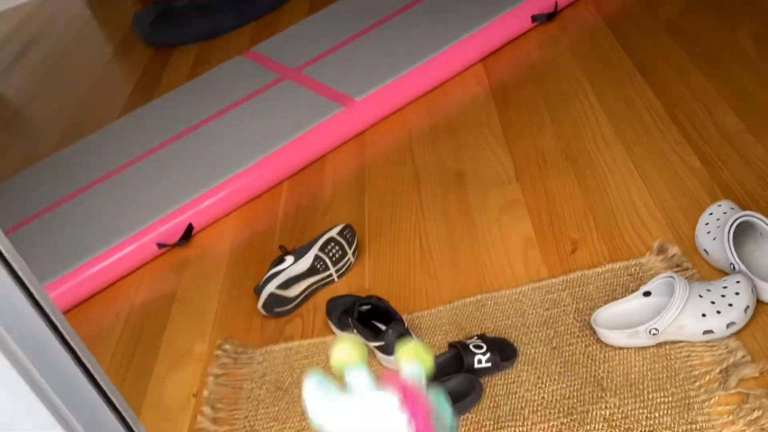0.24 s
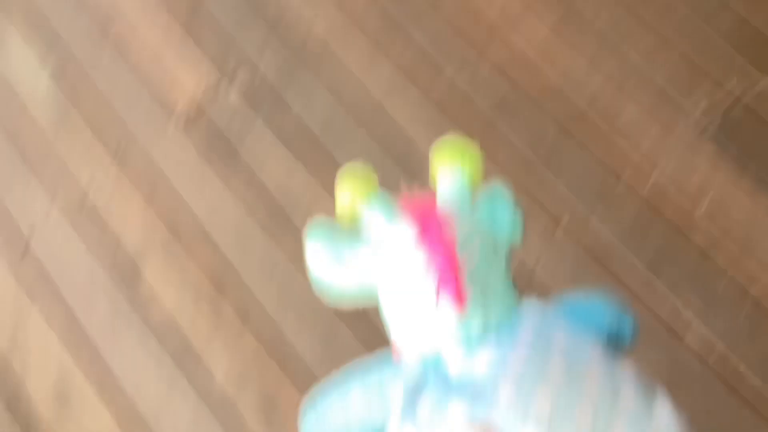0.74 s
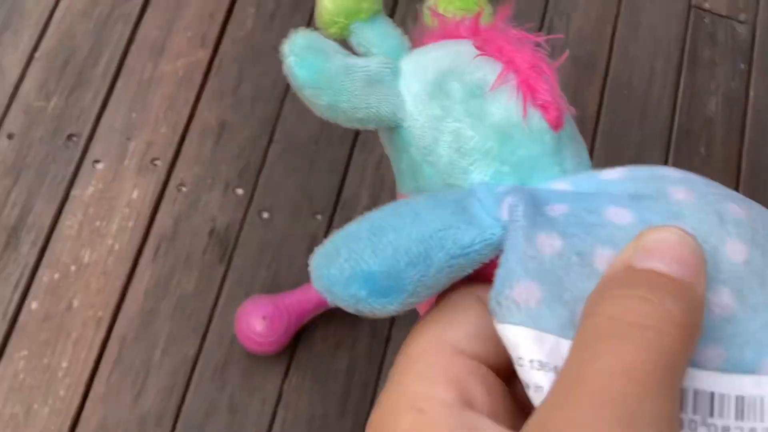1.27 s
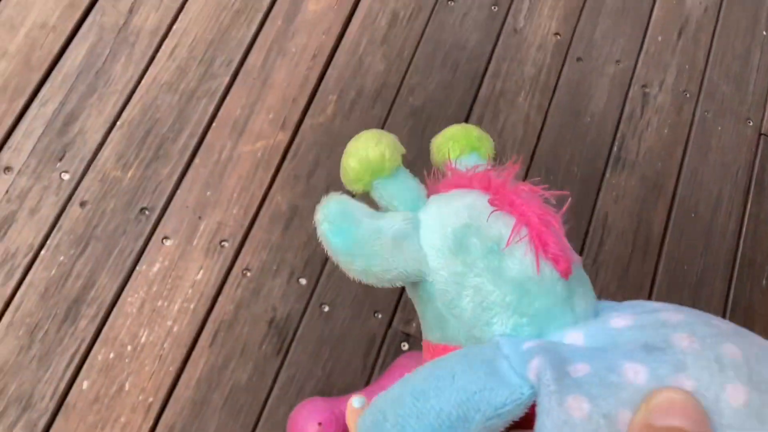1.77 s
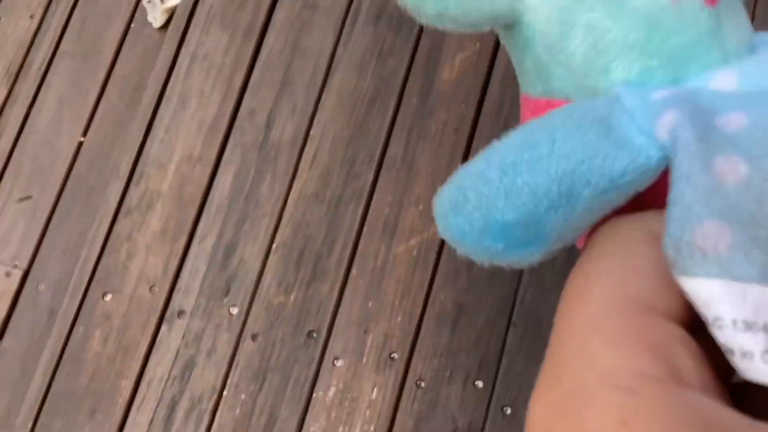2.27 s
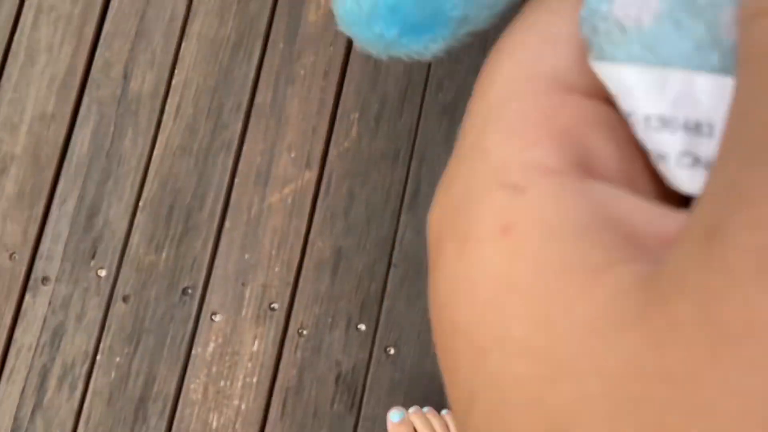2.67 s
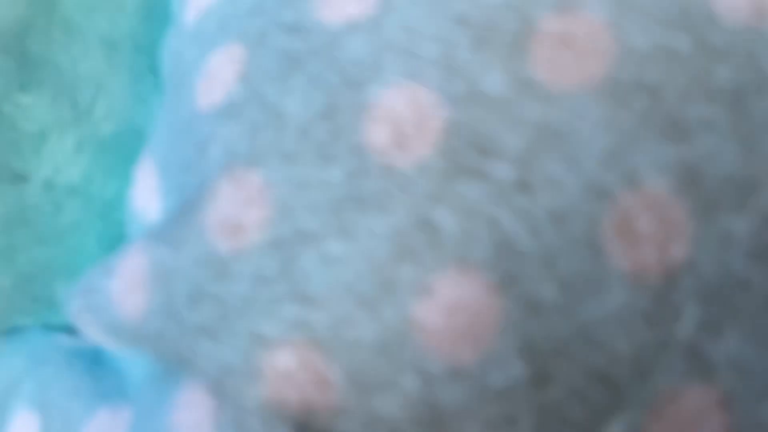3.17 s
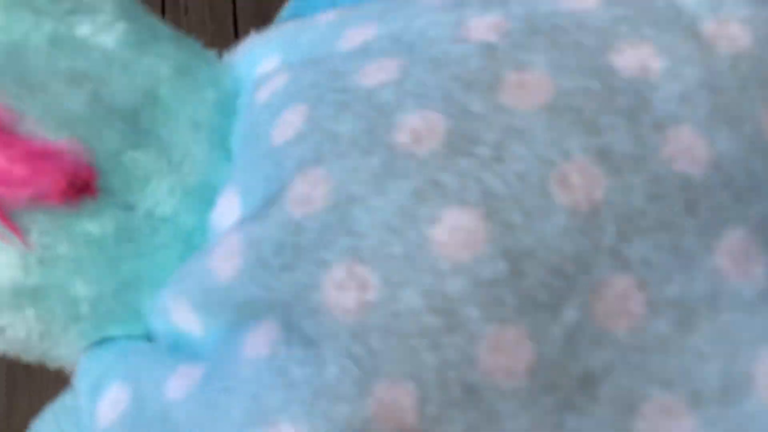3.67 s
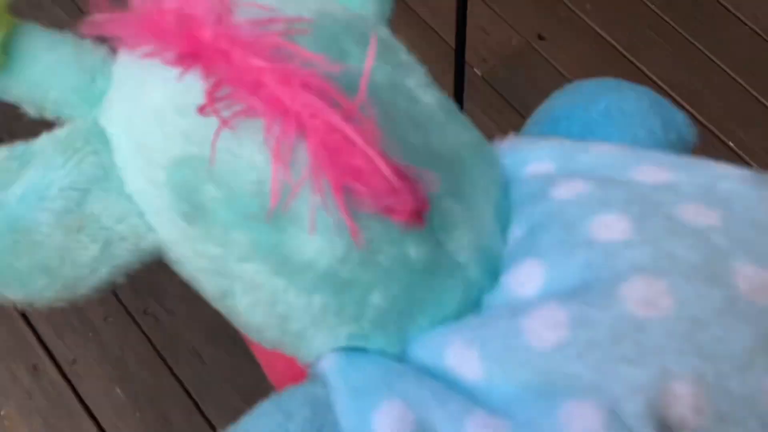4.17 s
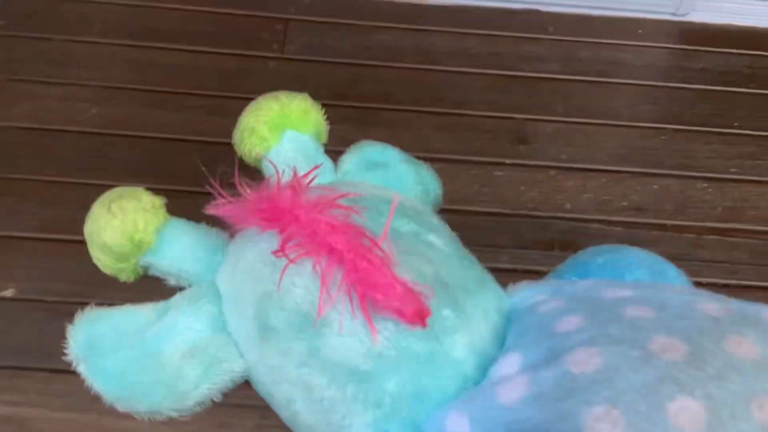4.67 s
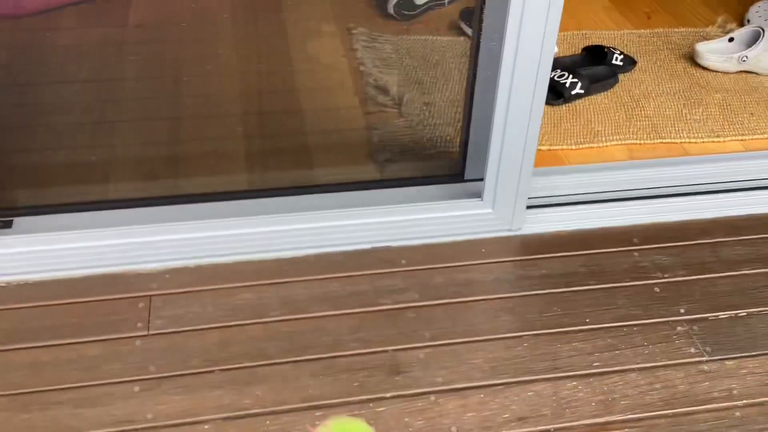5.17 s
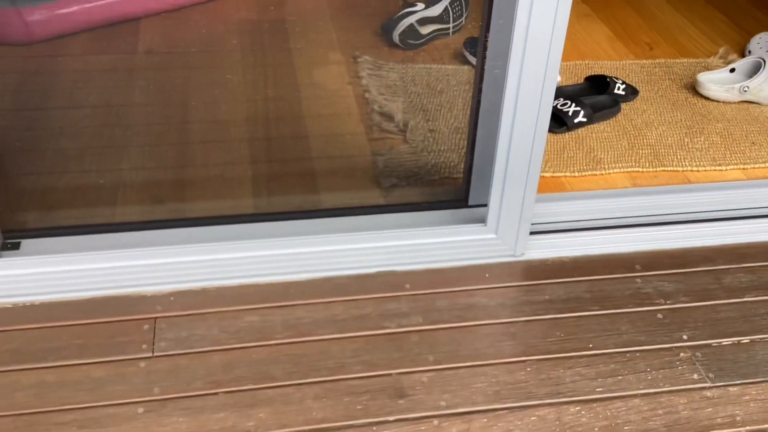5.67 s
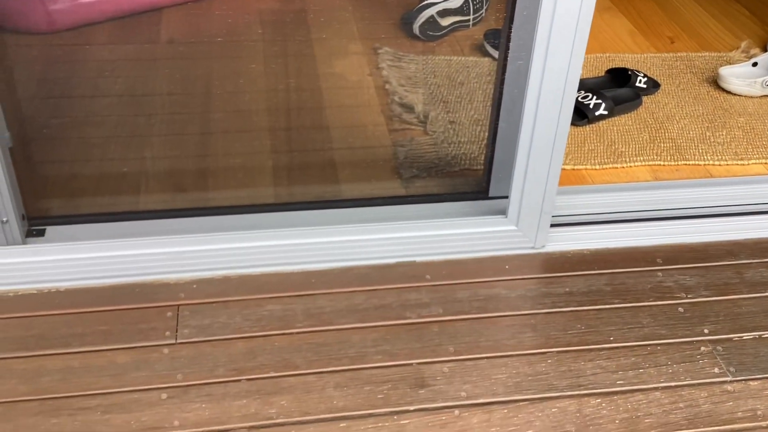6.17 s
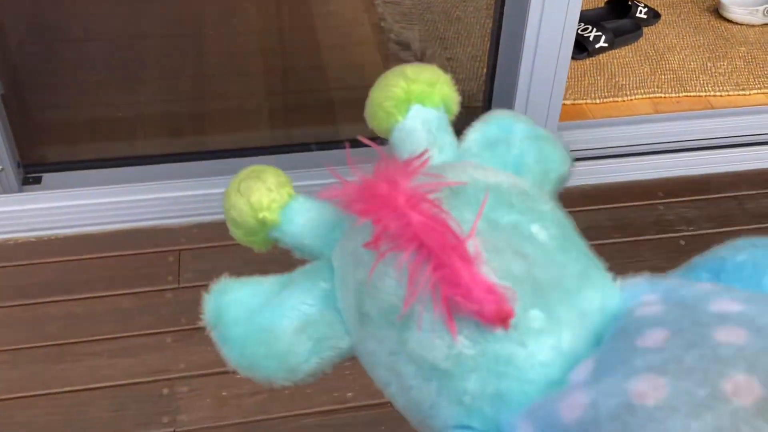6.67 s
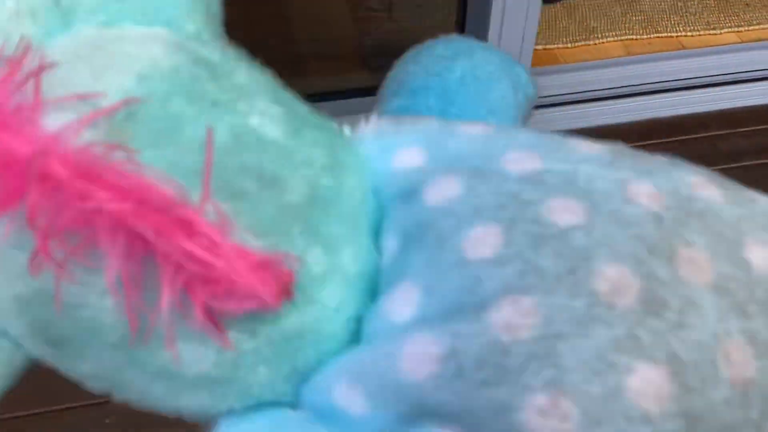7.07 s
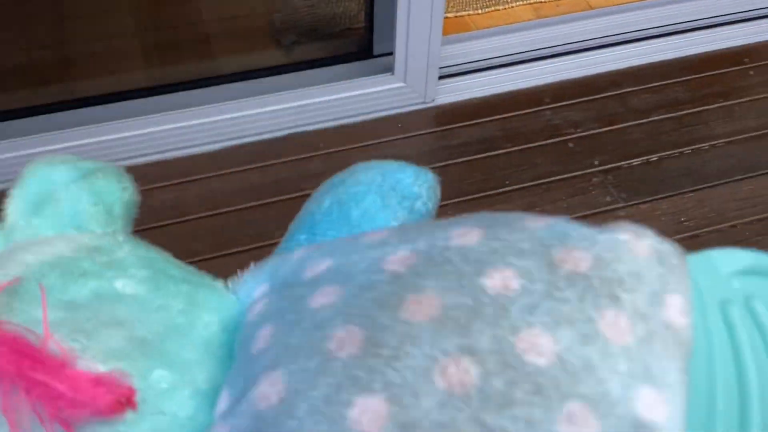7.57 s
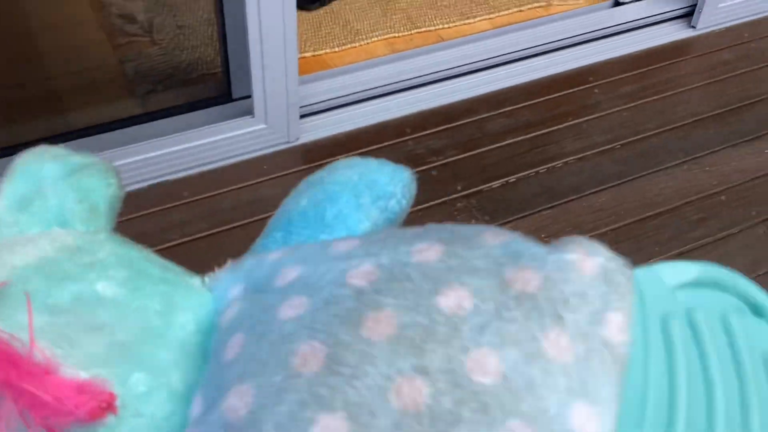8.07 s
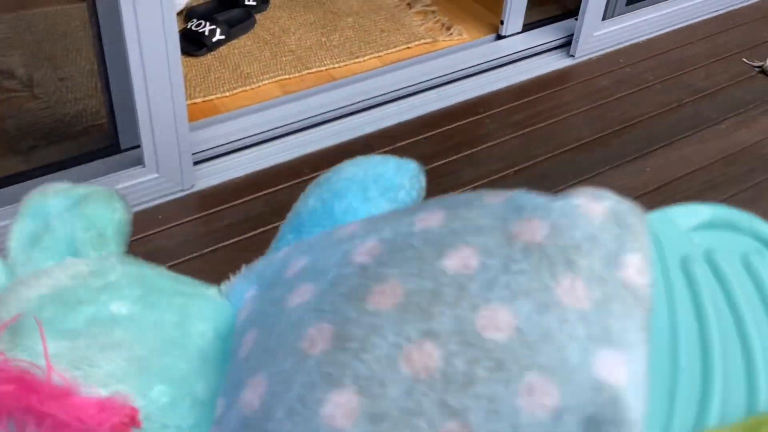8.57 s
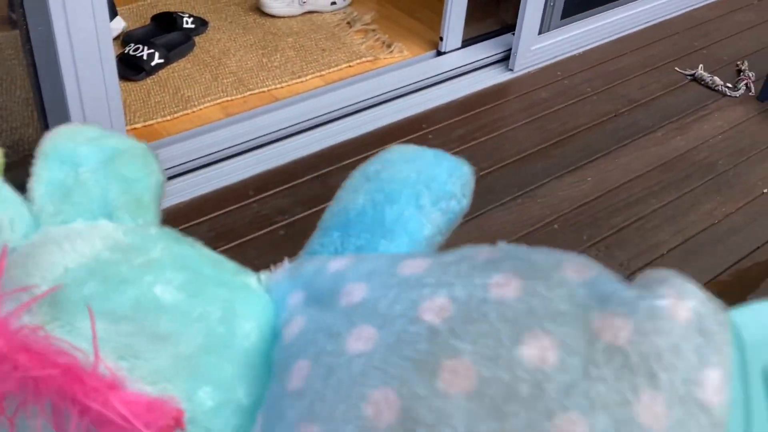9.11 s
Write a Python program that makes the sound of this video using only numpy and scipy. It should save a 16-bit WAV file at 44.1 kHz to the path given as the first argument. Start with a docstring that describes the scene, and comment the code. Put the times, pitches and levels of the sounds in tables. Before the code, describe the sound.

A plush dog toy is squeezed by hand close to the microphone, in a doorway and on a wooden deck. Each squeeze gives a very short, high, reedy squeak, and each release a slightly higher one. Faint rustles, ticks and soft knocks open the scene. Four squeaks sound from about 0.9 to 1.7 seconds, and another pair near 2.5, followed by a dull bump with a click and a soft foot scuff. From 3.2 to 4.8 seconds comes a fast, closer run of alternating squeaks, with two cracking into a screech near 3.5 and 3.8. Five more follow from 5.2 to 6.2. A pause holds only faint ticks and fabric rubbing. After a tiny squeak and soft knocks at 7.6, an even run lasts from 7.9 to 9.3 seconds. The wall and boards reflect the squeaks slightly, over a very quiet distant rumble and outdoor wash.

```python
"""In a doorway and on a wooden deck, a hand pumps the squeaker in a plush dog toy, close by.
Each squeeze blows a low reed and each release draws air back through a higher one. The hand shifts
the plush round the squeaker, so every squeak has its own colour. Soft knocks, ticks and rustles come
from the toy, hand and feet; house wall and deck answer faintly over a bed of distant rumble and wash."""
import sys
import numpy as np
from scipy import signal
from scipy.fft import rfft, irfft, next_fast_len
from scipy.io import wavfile

SR = 44100
rng = np.random.default_rng(int(sys.argv[2]) if len(sys.argv) > 2 else 0)


def store_wav(level_fs):
    """Save 16-bit WAV to argv[1]."""
    pcm = np.round(np.clip(np.atleast_2d(level_fs), -1, 1) * 32767)
    wavfile.write(sys.argv[1], SR, pcm.T.astype(np.int16))


N = 411894

# one squeak a row: (time [s], length [s], pressure crest [share of length], pitch at crest [Hz],
# reed level [dB], swell to crest [dB], fade after it [dB], roughness [0-1], delay of the bounce off
# the hand [ms], bounce strength [0-1], plush colour at 2.5, 5, 10 and 14 kHz [dB])
SQUEEZES = [(.947, .1, 0.1, 856.3, -30.5, 6.4, 8.7, .14, 0.27, .2, -4, -1.5, -1, 4),
            (1.404, 0.063, 0.088, 849, -27.5, 9.1, 10.8, .09, 0.8, .2, -9.5, 0, -11.5, -4),
            (2.474, 0.083, 0.57, 838.5, -32.5, 2.4, 9.9, 0.081, .15, .5, 0.5, 0, -5.5, -6),
            (3.185, .044, 0.086, 839.6, -24.5, 4, 10, 0.35, 0.49, .35, -12.5, -6.5, -1.5, -6),
            (3.459, 0.096, 0.43, 913.4, -28, 5.7, 16.6, .22, .14, .5, 4.5, 5.5, 5.5, 3.5),
            (3.774, 0.083, .49, 915, -29, 6.3, 14.3, 0.49, .15, .65, 6.5, 5.5, 4.5, 7.5),
            (4.088, 0.077, 0.38, 906.3, -23.5, 8.3, 9.5, 0.27, 0.46, .35, -12.5, 1.5, -4, 4.5),
            (4.429, 0.068, 0.63, 876.3, -30, 2.5, 23, 0.13, .15, .5, -3, 1.5, 4, 6.5),
            (4.73, 0.056, 0.63, 900, -24.5, 3.9, 59, 0.36, .52, .2, -11.5, -3, -2.5, -2.5),
            (5.428, 0.076, 0.3, 866.4, -26, 5.3, 7.8, 0.12, 0.69, .2, -12, 3.5, -5.5, -5.5),
            (5.8, 0.075, 0.28, 871, -25.5, 2.2, 6.9, 0.18, 0.49, .2, -12, 3.5, -4, -3.5),
            (6.154, .078, 0.32, 873.6, -25.5, 3.2, 13.4, 0.13, .48, .2, -12, 3.5, -11, -4.5),
            (7.893, 0.083, 0.43, 860.7, -27.5, 3.6, 15.3, 0.17, 0.27, .2, -1.5, -0.5, -1.5, -1.5),
            (8.298, 0.071, 0.13, 841.3, -27.5, 1, 7.2, 0.2, .5, .35, -8.5, -0.5, -2, -0.5),
            (8.7, 0.078, 0.3, 858.6, -26, 5.2, 13.8, .11, .5, .35, -11.5, -1, -3, 0.5),
            (9.084, 0.074, 0.36, 849, -27, 1.2, 14.4, 0.077, .51, .35, -14, -3, -4, -1.5)]
# spectrum of rubbing plush: (frequency [Hz], level [dB])
RUB_TONE = [(100, -20), (700, -5.5), (1500, 0), (3000, -2.5), (4300, -3), (5900, -1.5), (6500, -11),
            (10000, -8.5), (15500, -12.5)]


def squeezes():
    """Each squeeze blows air out through the low reed."""
    # resonances of the low reed and its pipe: (frequency [Hz], gain [dB])
    pipe_tone = [(700.0, 3), (900.0, 1.5), (1700.0, 2.5), (2600.0, 10), (3500.0, 3.5), (4300.0, -0.6),
                 (5800.0, -2.1), (6900.0, -7.5), (8200.0, -4.5), (9500.0, 3.5), (11000.0, 1.5),
                 (12200.0, -4.5), (14000.0, -6.5), (15800.0, -13.5)]
    return squeaks(SQUEEZES, pipe_tone, hz_per_db=9.5, dull_hz=11900, free_hz=1083, start_db=-8.5)


def releases():
    """Each release draws air back in through the high reed."""
    # one inward squeak a row, columns as in SQUEEZES
    breaths = [(1.137, 0.088, 0.34, 1119, -27.5, 2, 5.6, .08, .28, 0.39, .5, 5, -6.5, 0),
               (1.585, 0.078, 0.56, 1109, -28, 2.5, 10, 0.084, .27, 0.59, -4, 3, -5.5, -7),
               (2.669, 0.081, 0.39, 1095, -28.5, 2, 23.5, 0.071, .39, .53, -3.5, 1.5, -5.5, -3.5),
               (3.345, 0.073, 0.49, 1110, -21.5, 1.5, 13, 0.058, .24, 0.24, -4, -5.5, 2, -5),
               (3.635, 0.085, .29, 1110, -22, 1.5, 7.2, 0.053, .39, 0.19, -9, -2, -4, 0),
               (3.95, 0.088, 0.22, 1117, -26.5, 2, 5.3, .08, .16, 0.54, 0.5, 3.5, 2.5, 1.5),
               (4.27, 0.075, .33, 1119, -28.5, 2, 12.6, 0.077, .15, .65, 2, 8, 3, 4),
               (4.603, 0.062, .36, 1110, -24, 0.5, 11.2, 0.082, .42, .15, -5.5, -1.5, -2.5, 2),
               (5.251, .077, 0.055, 1081, -28.5, 0, 6.6, 0.076, 0.27, 0.18, -2.5, 0, 2.5, -6.5),
               (5.62, 0.057, 0.16, 1078, -29.5, 10, 13.3, 0.075, .21, 0.33, 2, 3, -7.5, -1),
               (7.58, .022, 0.15, 1116, -23.5, 4.5, 3.5, 0.12, .67, 0.3, -1.5, 3, 0, -10),
               (8.084, .05, 0.5, 1129, -22.5, 3.5, 4.9, 0.16, 0.65, 0.25, 1, 0.5, -4, -0.5),
               (8.498, 0.043, 0.2, 1090, -25.5, 3, 1.5, 0.093, 0.6, 0.048, -3.5, 2, -2.5, -2.5),
               (8.898, 0.054, 0.41, 1090, -26.5, 3.5, 10.6, .08, 0.55, 0.068, -4.5, 1.5, -2.5, -1.5),
               (9.276, 0.041, 0.27, 1085, -28, 0, 16.8, .08, .23, 0.33, 0, -1, -.5, -5)]
    # resonances of the high reed and its pipe: (frequency [Hz], gain [dB])
    pipe_tone = [(850.0, 0), (1100.0, 1.5), (2200.0, 7), (3300.0, 1.5), (4400.0, -2.5), (5550.0, -10.5),
                 (6600.0, -17.5), (7700.0, -22.5), (8900.0, -3.5), (10000.0, 3), (11100.0, 9),
                 (12300.0, -1.5), (14400.0, -7), (15800.0, -19.5)]
    return squeaks(breaths, pipe_tone, hz_per_db=13.5, dull_hz=11000, free_hz=1340, start_db=-8)


def squeaks(rows, pipe_tone, hz_per_db, dull_hz, free_hz, start_db):
    """Each squeak is coloured by pipe and plush, and comb-filtered by its own bounce off the hand."""
    # bands of the plush colour, the first held at 0 dB: (frequency [Hz])
    plush_bands = [1000, 2500, 5000, 10000, 14000]
    out, hz = np.zeros(N), np.fft.rfftfreq(1024, 1 / SR)
    bass_loss_db = -10 * np.log10(1 + (560 / (hz + 30)) ** 8)  # a small pipe radiates almost no bass
    pipe_db = curve_at(pipe_tone, hz) + bass_loss_db
    for row in rows:
        start, level_db, bounce_ms, bounce = row[0], row[4], row[8], row[9]
        plush_db = curve_at(list(zip(plush_bands, [0, *row[10:]])), hz)
        comb_db = 20 * np.log10(abs(1 + bounce * np.exp(-2j * np.pi * hz * bounce_ms / 1000)))
        add(out, start, colour(reed(row[:8], hz_per_db, dull_hz), pipe_db + plush_db + comb_db))
        add(out, start - .018, gain_of(level_db + start_db) * reed_onset(free_hz))
    return out


def reed(row, hz_per_db, dull_hz, waver=.0022, jitter=.0085, smear=.085, attack_s=.005, release_s=.005):
    """The reed chops the air into pulses; pitch, level and brightness follow the arch of pressure."""
    start, length, crest, crest_hz, level_db, swell_db, fade_db, roughness = row
    t = np.arange(0, length, 1 / SR)
    climb_db = swell_db * np.maximum(1 - t / length / crest, 0) ** 2
    droop_db = fade_db * np.maximum((t / length - crest) / (1 - crest), 0) ** 2.3
    stall_hz = 60 * np.exp((t - length) / .003)  # the pitch sags as the air runs out
    jump, screech = overblowing(start + t)
    hz = crest_hz - hz_per_db * (climb_db + droop_db) - stall_hz + 108 * jump
    # uneven closing of the reed frays the upper harmonics first
    rasp = roughness * (1.2 - .2 * t / length) + screech
    cycles = np.cumsum(hz * (1 + waver * wander(220, len(t)))) / SR
    cycles += jitter * rasp * wander(500, len(t))
    harmonic = np.arange(1, SR / 2 // hz.max())[:, None]
    # the plush shifts under the fingers, so single overtones swell and sink
    sway_db = 1.4 * np.array([wander(78, len(t)) for _ in harmonic]) * np.minimum((harmonic - 1) / 4, 1)
    # overblown, the reed locks on to its second mode, which lifts the overtone near 6 kHz
    shriek_db = 6 * jump * np.exp(-((harmonic * hz - 6000) / 500) ** 2)
    dulling_db = droop_db * (1 + harmonic * hz / dull_hz)
    # near the end the reed no longer shuts fully, so the overtones break off first
    break_db = 6 * np.log(harmonic) * np.exp((t - length) / .0041)
    strength = gain_of(sway_db + shriek_db - dulling_db - break_db)
    chirp = smear * harmonic ** 2 / 2  # the pipe spreads each pulse in time
    pulses = (strength * np.cos(2 * np.pi * (harmonic * cycles - chirp))).sum(0)
    # air hisses through each opening, and spits as the reed first slaps shut
    flow = gain_of(-21 - droop_db) * np.sqrt(rasp) + gain_of(-9) * np.exp(-t / attack_s)
    opening = 1 + np.cos(2 * np.pi * cycles)
    air = flow * opening * noise([(500, -18.5), (4000, 1), (7000, 1), (16000, -7)], len(t))
    fade_in = np.sin(np.pi / 2 * ramp(t, 0, attack_s)) ** 2
    fade_out = np.minimum((length - t) / release_s, 1) ** .62
    return gain_of(level_db - climb_db) * fade_in * fade_out * (pulses + 2 * air)


def reed_onset(hz, growth_s=.0027, overtone_gain=.76):
    """Before it beats, the reed swings freely above its playing pitch; overtones grow with the swing."""
    t = np.arange(-.02, .004, 1 / SR)
    swing = np.exp(np.minimum(t, -3 * t) / growth_s)
    phase = 2 * np.pi * hz * t
    overtones = np.sin(2 * phase) + np.sin(3 * phase) / 2
    return swing * np.sin(phase) + overtone_gain * swing ** 1.5 * overtones


def overblowing(t, jump_s=.0065, slip_s=.012, screech_s=.027):
    """Pitch jump (0-1) and added roughness: the overblown reed leaps up, then screeches as it slips back."""
    # the two hardest squeezes: (time of the jump [s], hold [s])
    overblows = [(3.488, .029), (3.808, .015)]
    jump = screech = 0
    for start, hold in overblows:
        slip = ramp(t, start + hold, slip_s)
        jump += ramp(t, start, jump_s) - slip
        screech += slip - ramp(t, start + hold + slip_s, screech_s)
    return jump, .22 * screech


def last_air(level_db=-52.5, t60=.2):
    """As the reed stops, the last air of each squeeze hisses out of the pipe."""
    # spectrum of the hiss: (frequency [Hz], level [dB])
    hiss_tone = [(500, -23.5), (2000, -3.5), (4500, -2.5), (7500, 2), (11000, 1), (16000, -8)]
    out, t = np.zeros(N), np.arange(SR // 4) / SR
    envelope = gain_of(level_db - 60 * t / t60) * ramp(t, 0, .01)
    for start, length, *_ in SQUEEZES:
        add(out, start + length - .01, envelope * noise(hiss_tone, len(t)))
    return out


def reed_hums():
    """Air too weak to make the reed beat sets it humming in a soft, wavering, falling tone."""
    # weak breaths: (time [s], level [dB], pitch [Hz], length [s])
    breaths = [(4.919, -61, 1284, 0.036), (6.64, -61.5, 1143, 0.037)]
    out = np.zeros(N)
    for start, db, hz, length in breaths:
        size = int(length * SR)
        glide = np.linspace(1.04, .96, size) + .036 * wander(200, size)
        cycles = np.cumsum(hz * glide) / SR
        add(out, start, gain_of(db) * np.hanning(size) * np.sin(2 * np.pi * cycles))
    return out


def knocks(rise_s=.0049, puff_db=-2):
    """Bulb, hand and feet give damped knocks, each a low tone in a broad puff of noise."""
    # soft impacts: (time [s], level [dB], pitch [Hz], t60 [s])
    hits = [(0.775, -44.5, 326, 0.058), (0.846, -47, 276, 0.15), (2.015, -52, 215, 0.12),
            (2.698, -51, 400, 0.17), (2.764, -51.5, 424, .06), (2.772, -39, 193, 0.043),
            (2.78, -35.5, 106.3, 0.067), (3.414, -46, 345, 0.065), (3.627, -29, 340, 0.025),
            (4.15, -53, 400, 0.063), (4.237, -43, 330, 0.039), (4.482, -50, 344, 0.064),
            (4.561, -41.5, 306, 0.045), (4.842, -47, 301, 0.05), (7.04, -53.5, 263, 0.16),
            (7.6, -42, 448, 0.069), (7.614, -35.5, 330, 0.034), (7.745, -45, 263, .07),
            (8.128, -53, 470, 0.059), (8.156, -34.5, 350, 0.022), (8.537, -57, 410, 0.062)]
    out, t = np.zeros(N), np.arange(SR // 3) / SR
    for start, db, hz, t60 in hits:
        puff_tone = [(hz / 4, -18), (hz / 2, -3), (hz, 0), (hz * 2, -10), (hz * 5, -30), (hz * 25, -60)]
        body = np.sin(2 * np.pi * hz * t) / 2 + gain_of(puff_db) * noise(puff_tone, len(t))
        add(out, start, gain_of(db - 60 * t / t60) * (1 - np.exp(-t / rise_s)) * body)
    return out


def ticks():
    """Plastic and seams tick in sharp, fast-dying bursts of noise."""
    # sharp impacts: (time [s], level [dB], t60 [s])
    hits = [(0.542, -52.5, 0.046), (0.639, -53.5, .03), (0.675, -54, 0.033), (0.743, -52, 0.033),
            (0.774, -58, .04), (0.845, -63, 0.03), (0.866, -51.5, 0.045), (2.765, -35.5, 0.0066),
            (2.767, -35.5, 0.036), (2.913, -52.5, 0.023), (3.626, -52, 0.033), (6.369, -49.5, .01),
            (6.803, -63, 0.016), (7.037, -57, 0.02), (7.067, -54.5, 0.012), (7.137, -65.5, 0.019),
            (7.746, -59, 0.024)]
    # spectrum of a tick: (frequency [Hz], level [dB])
    tick_tone = [(200, -2), (700, -5.5), (2000, -1), (5500, -17.5), (7500, -19), (15000, -21)]
    out, t = np.zeros(N), np.arange(SR // 3) / SR
    for start, db, t60 in hits:
        add(out, start, gain_of(db - 60 * t / t60) * noise(tick_tone, len(t)))
    return out


def plush_rustles(squeeze_s=.32, squeeze_db=-73):
    """The plush rubs under the fingers with each new grip and each squeeze."""
    # changes of grip: (time [s], length [s], level [dB])
    grips = [(.312, 0.17, -66), (.45, 1.18, -59.5), (1.98, .14, -64), (2.172, 0.23, -68.5),
             (2.786, .14, -61), (6.611, .09, -74), (6.821, .16, -76), (7.0, 0.15, -76), (7.28, .13, -74)]
    pumping = [(row[0], squeeze_s, squeeze_db) for row in SQUEEZES]
    return friction(grips + pumping, RUB_TONE, grain_db=1.5)


def foot_shuffles():
    """Feet scuff dully on the boards."""
    # scuffs: (time [s], length [s], level [dB])
    scuffs = [(.735, 0.03, -58), (2.93, .1, -53)]
    # spectrum of a scuff: (frequency [Hz], level [dB])
    scuff_tone = [(60, -17.5), (240, 3), (450, -16), (2000, -30), (8000, -58)]
    return friction(scuffs, scuff_tone, grain_db=4)


def friction(rows, tone, grain_db):
    """Sliding surfaces make soft swells of grainy noise."""
    out = np.zeros(N)
    for start, length, db in rows:
        size = int(length * SR)
        grain = unit_rms(gain_of(grain_db * wander(150, size)))
        add(out, start, gain_of(db) * np.hanning(size) * grain * noise(tone, size))
    return out


def reflection_send(closest_s=3.25, approach_s=.45, retreat_s=1.4, dip_db=-10.5):
    """The toy comes up close once: its reflections dip, so the direct sound outweighs them."""
    t = np.arange(N) / SR
    closeness = ramp(t, closest_s - approach_s, approach_s) - ramp(t, closest_s, retreat_s)
    return gain_of(dip_db * closeness)


def wall_slap(sound, delay_s=.047, slap_db=-31, cutoff_hz=4200):
    """The house wall returns one dull echo."""
    out = np.zeros(N)
    add(out, delay_s, gain_of(slap_db) * lowpass(sound, cutoff_hz))
    return out


def deck_reverb(sound, early_db=9, early_s=.2):
    """Sparse reflections, strongest from the nearby body and boards; each band dies at its own speed."""
    # tail of wall and deck: (frequency [Hz], level before the early lift [dB], t60 [s])
    bands = [(200, -28, 0.55), (902, -30.5, 0.52), (2500, -33, 0.39), (5030, -29.5, 0.35),
             (8000, -34.5, 0.69), (11000, -28.5, 0.3), (16000, -27, .3)]
    taps = rng.standard_normal(SR) * (rng.random(SR) < 3000 / SR)
    taps *= np.arange(SR) > .003 * SR  # pre-delay
    hz, t, spectrum = signal.stft(taps, SR, nperseg=256)
    decay = gain_of(-60 * t / curve_at(bands, hz, column=2)[:, None])
    decay *= gain_of(curve_at(bands, hz))[:, None] / np.sqrt((decay ** 2).mean(1, keepdims=True))
    decay *= gain_of(early_db * np.exp(-t / early_s))
    tail = signal.istft(spectrum * decay, SR, nperseg=256)[1] / np.linalg.norm(taps)
    return signal.fftconvolve(sound, tail)[:N]


def background(rumble_db=-63.5, wash_db=-66, rub_db=-84):
    """Distant rumble slowly eases, the outdoor wash drops once, and the held plush rubs all the time."""
    # spectrum of the distant rumble: (frequency [Hz], level [dB])
    rumble_tone = [(20, -52), (38, -27.5), (50, -10.5), (63, 0), (80, -3.5), (100, -6.5), (140, -9.5),
                   (250, -13), (500, -25.5), (1500, -73)]
    # spectrum of the wash of the surroundings: (frequency [Hz], level [dB])
    wash_tone = [(40, -32.5), (150, -1.5), (300, -6), (600, -4), (1100, -4), (2000, -9.5), (3500, -17.5),
                 (5800, -20.5), (7000, -31), (11000, -24.5), (16000, -37)]
    t = np.arange(N) / SR
    rumble = gain_of(rumble_db - .5 * t + 1.5 * wander(8, N))
    wash = gain_of(wash_db - 8.5 * ramp(t, start=4.2, length=.8))
    rub = gain_of(rub_db) * unit_rms(gain_of(3 * wander(60, N)))
    return rumble * noise(rumble_tone, N) + wash * noise(wash_tone, N) + rub * noise(RUB_TONE, N)


def gain_of(db):
    """Decibels to amplitude."""
    return 10 ** (np.asarray(db) / 20)


def unit_rms(x):
    """Scales to an rms of 1."""
    return x / np.sqrt(np.mean(x ** 2) + 1e-20)


def ramp(t, start, length):
    """Rises in a straight line from 0 to 1."""
    return np.clip((t - start) / length, 0, 1)


def curve_at(points, hz, column=1):
    """Reads a column of a table on a log-frequency axis."""
    table = np.array(points)
    return np.interp(np.log(hz + 1), np.log(table[:, 0] + 1), table[:, column])


def add(mix, start, sound):
    """Mixes a sound in at a time in seconds."""
    part = mix[round(start * SR):][:len(sound)]
    part += sound[:len(part)]


def noise(tone, size):
    """Noise of rms 1 with a given spectrum."""
    padded = next_fast_len(size)
    shape = gain_of(curve_at(tone, np.fft.rfftfreq(padded, 1 / SR)))
    return unit_rms(irfft(rfft(rng.standard_normal(padded)) * shape, padded)[:size])


def lowpass(x, hz):
    """Rolls off the top at 12 dB an octave."""
    return signal.sosfilt(signal.butter(2, hz, fs=SR, output="sos"), x)


def wander(rate_hz, size):
    """Smooth random drift of rms 1, mostly slower than the given rate."""
    return unit_rms(lowpass(rng.standard_normal(size), rate_hz))


def colour(x, db):
    """Minimum-phase EQ with a dB curve given from 0 to SR / 2."""
    log_gain = np.r_[db, db[-2:0:-1]] * np.log(10) / 20
    response = np.exp(signal.hilbert(log_gain).conj())
    return signal.fftconvolve(x, np.fft.ifft(response).real)


def scene(width_db=-16):
    """Everything sits in the middle; only the high treble differs a little between the ears."""
    toy = squeezes() + releases() + last_air() + reed_hums()
    direct = toy + knocks() + ticks() + plush_rustles() + foot_shuffles()
    send = direct * reflection_send()
    mid = direct + wall_slap(send) + deck_reverb(send) + background()
    treble = signal.firwin(401, 5900, window=("kaiser", 8), pass_zero=False, fs=SR)
    side = gain_of(width_db) * signal.oaconvolve(signal.hilbert(mid).imag, treble, "same")
    return np.array([mid + side, mid - side])


def record(dry):
    """Rolls off the deep bass and cuts the very top."""
    low_cut = signal.butter(4, 45, "high", fs=SR, output="sos")
    high_cut = signal.firwin(301, 15950, window=("kaiser", 8), fs=SR)
    return signal.oaconvolve(signal.sosfilt(low_cut, dry), high_cut[None], "same")


dry = scene()
out = record(dry)
store_wav(out)
```